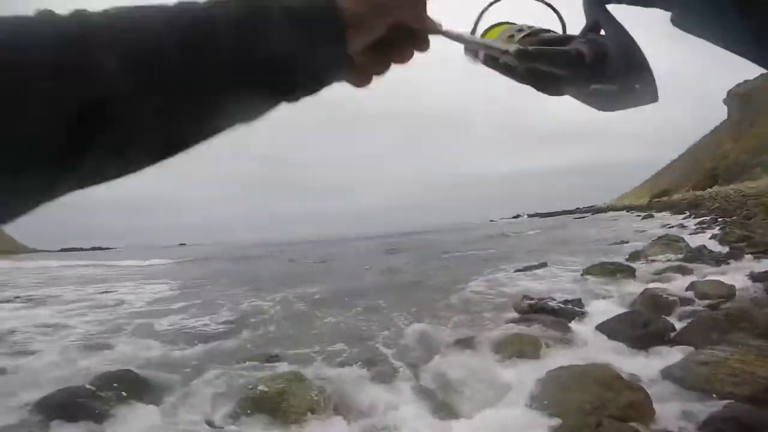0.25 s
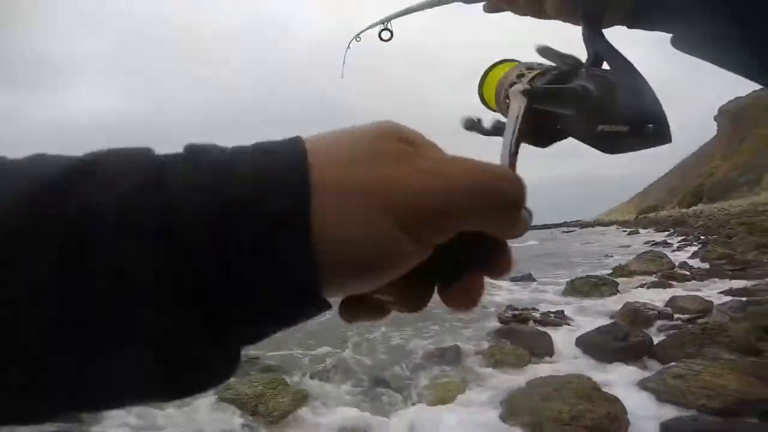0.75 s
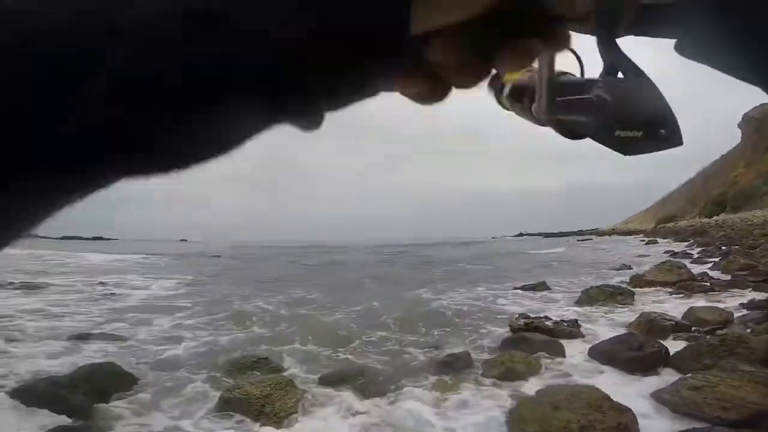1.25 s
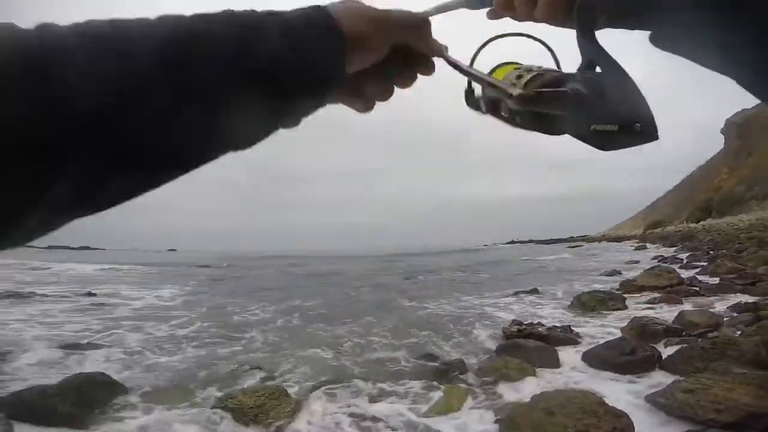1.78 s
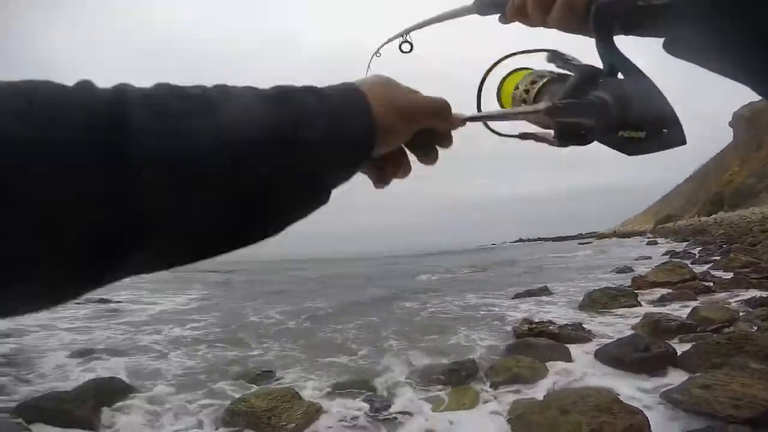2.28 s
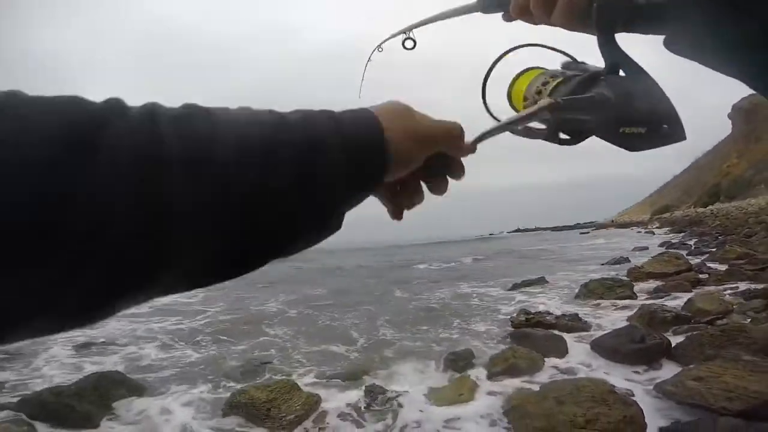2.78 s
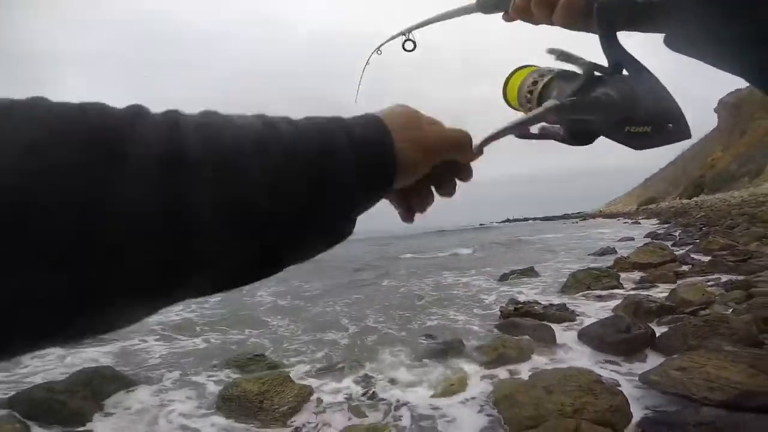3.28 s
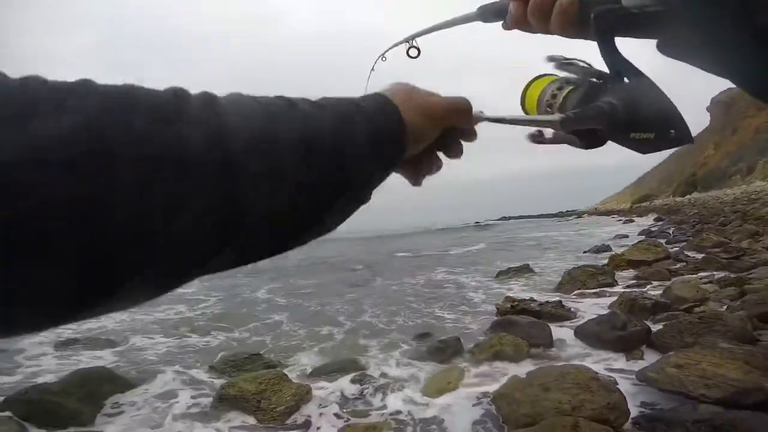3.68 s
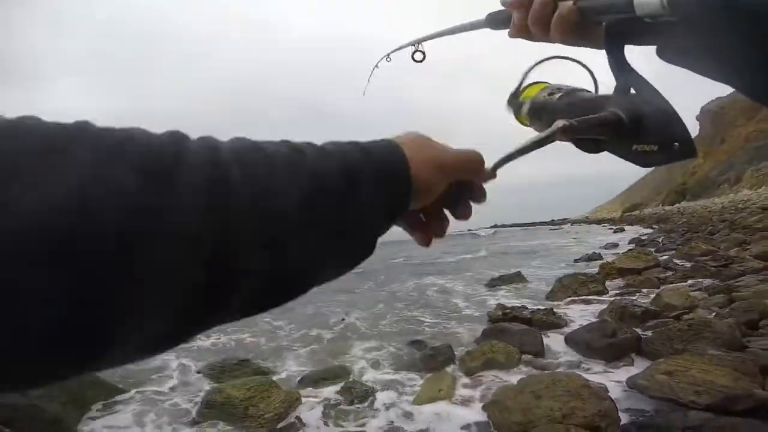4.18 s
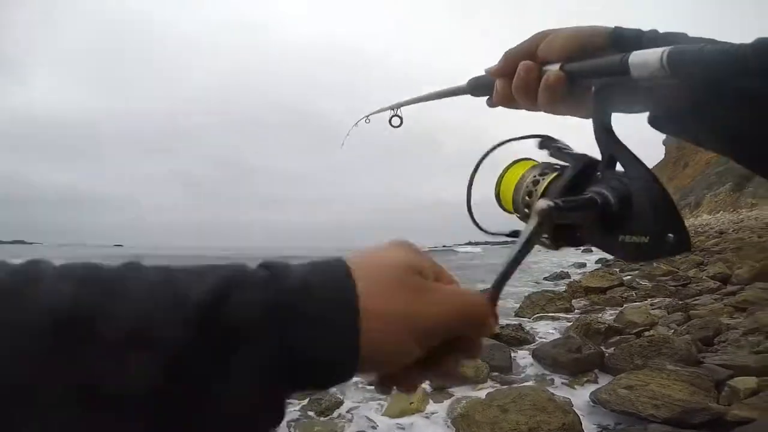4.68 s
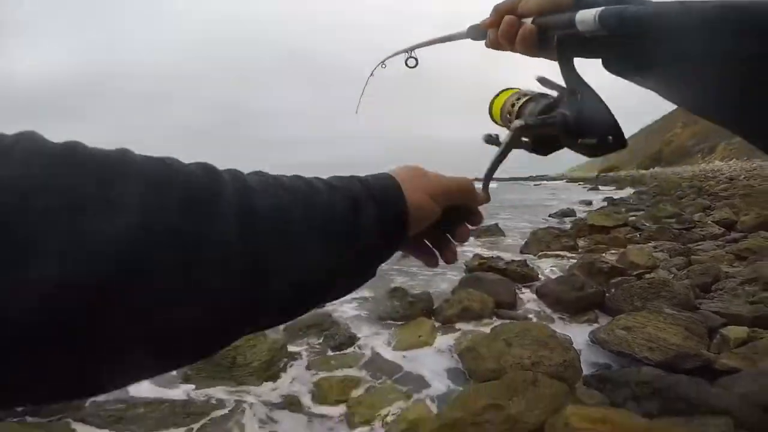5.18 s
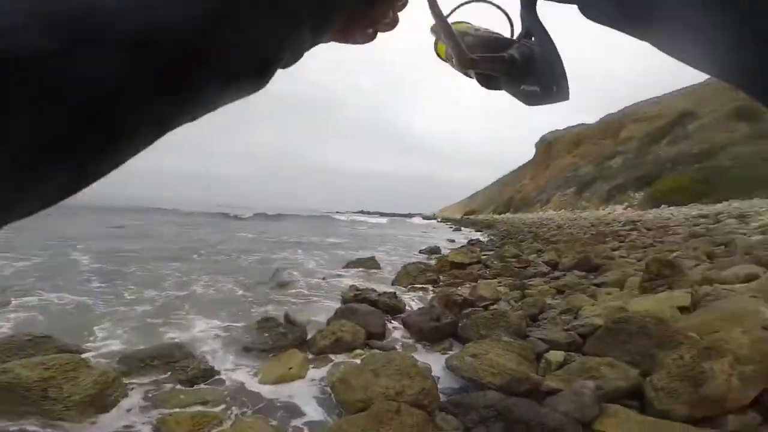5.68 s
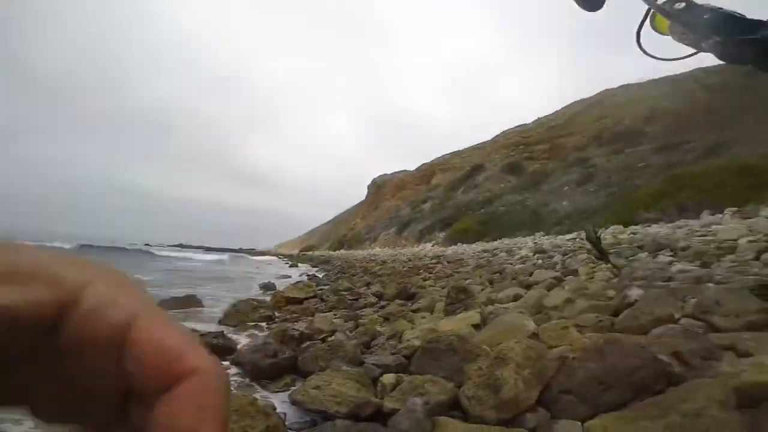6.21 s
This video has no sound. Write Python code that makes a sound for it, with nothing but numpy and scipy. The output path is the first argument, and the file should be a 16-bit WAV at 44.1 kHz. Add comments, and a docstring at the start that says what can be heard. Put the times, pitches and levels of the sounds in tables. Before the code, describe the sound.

A wave drains fizzing off nearby rocks, then muffled distant surf hisses under low wind buffeting, faint reel whirr and ticks, ending in heavy knocks.

```python
"""First a wave drains off wet rocks close by, with drops landing in its foam; then the far shore washes on.
All is heard at one microphone inside a closed camera housing. Water is filtered noise and bubble grains.
A cranked fishing reel whirrs and ticks (random gear touches, tiny rings) and jolts the mount (damped swings).
Wind buffets the microphone as low noise, and at the end a hand knocks and rubs the ringing shell."""
import sys
import numpy as np
from scipy import signal
from scipy.fft import rfft, irfft, next_fast_len
from scipy.io import wavfile
from scipy.ndimage import uniform_filter1d

SR = 44100
rng = np.random.default_rng(int(sys.argv[2]) if len(sys.argv) > 2 else 0)


def unload_wav(signal):
    """Save mono or channel-first audio to the path in sys.argv[1] as 16-bit WAV at rate SR, clipped to [-1, 1]."""
    wavfile.write(
        sys.argv[1],
        SR,
        np.round(np.clip(np.atleast_2d(signal).T, -1, 1) * 32767).astype(np.int16),
    )


def natural_amplitude(level_db):
    """Convert a level in decibels to a linear amplitude factor, elementwise."""
    exponent = np.asarray(level_db, float) / 20
    return 10 ** exponent


N = 284437
TIME = np.arange(N) / SR


def evened(x):
    """Scales to unit power."""
    return x / np.sqrt(np.mean(x ** 2) + 1e-20)


def read(points, hz):
    """Reads a spectrum in dB on a log-frequency axis."""
    f, value = np.transpose(points)
    return np.interp(np.log(hz + 1), np.log(f + 1), value)


def curve(rows, column=1):
    """One column of a table over all time, -200 dB outside it."""
    rows = np.array(rows)
    return np.interp(TIME, rows[:, 0], rows[:, column], -200, -200)


def add(mix, s, sound):
    """Mixes a sound in at second s."""
    part = mix[round(s * SR):][:len(sound)]
    part += sound[:len(part)]


def coloured(x, gain_db):
    """Filters x by a function from Hz to dB and evens the power."""
    size = next_fast_len(N)
    spectrum = rfft(x, size) * natural_amplitude(gain_db(np.fft.rfftfreq(size, 1 / SR)))
    return evened(irfft(spectrum, size)[:N])


def wander(hz):
    """Chance in a band: changes at about hz a second, with no long swells, at unit power."""
    def band_db(f):
        return -20 * np.log10(1 + (f / hz) ** 2 + (hz / 3 / (f + .01)) ** 2)
    return coloured(rng.standard_normal(N), band_db)


def ringing_db(modes, hz):
    """The summed response of (Hz, width, dB) resonances."""
    return 10 * np.log10(sum(natural_amplitude(db) ** 2 / (1 + (2 * (hz - f) / width) ** 2) for f, width, db in modes))


def ring(db, hz, cycles):
    """A tiny ring with a soft start: its envelope peaks after a third of the given cycles."""
    turns = np.arange(int(4 * cycles * SR / hz) + 4) * hz / SR
    u = 3 * turns / cycles
    return natural_amplitude(db) * np.sin(2 * np.pi * turns) * u * np.exp(1 - u)


def hiss(patchy_db):
    """Countless tiny bubbles: noise with drifting patches in time and frequency."""
    hz, t, z = signal.stft(rng.standard_normal(N), SR, nperseg=512, noverlap=384)
    patches = uniform_filter1d(rng.standard_normal(z.shape), 6, 0)  # smooth across pitch
    patches = evened(uniform_filter1d(patches, 20, 1))  # and along time
    return evened(signal.istft(z * natural_amplitude(patchy_db * patches), SR, nperseg=512, noverlap=384)[1][:N])


def bursts(per_s, spread_db, cycles):
    """Bursting bubbles: short rising grains of many pitches, a few of them large."""
    out = np.zeros(N)
    for hz in np.geomspace(400, 14000, num=24):
        u = np.linspace(0, 1, int(SR / hz * cycles) + 2)
        grain = np.sin(2 * np.pi * cycles * (u + 0.15 * u ** 2)) * u * np.exp(-4 * u)
        size = natural_amplitude(spread_db * np.minimum(rng.exponential(1, N), 4))
        size *= rng.random(N) < per_s / 24 / SR  # the pitches share the bursts evenly
        out += signal.oaconvolve(size, grain / np.linalg.norm(grain) * np.sqrt(hz))[:N]
    return out


# cavities around the microphone lift or cut narrow bands of the water: (pitch [Hz], width [Hz], lift [dB])
CAVITIES = [(1278, 100, 6), (2187, 420, 5), (2776, 145, 5), (3130, 61, 7), (3540, 220, 4), (5050, 420, 5.5),
            (6205, 180, 6), (7200, 1200, 3.5), (8770, 590, -3), (12050, 760, -6)]


def housing_db(hz):
    """The lift or cut that the housing cavities give."""
    return sum(db / (1 + (2 * (hz - f) / width) ** 2) for f, width, db in CAVITIES)


def swaying(x):
    """As the housing sways, the cavities that colour x drift in pitch and strength."""
    sway_hz, sway_depth = 50, .28  # rms drift in pitch and in share of the lift
    hz, t, z = signal.stft(x, SR, nperseg=1024, noverlap=768)
    drift, depth = (np.interp(t, TIME, wander(hz=1.67)) for _ in range(2))
    lift_db = housing_db(hz[:, None] + sway_hz * drift) * (1 + sway_depth * depth)
    return evened(signal.istft(z * natural_amplitude(lift_db), SR, nperseg=1024, noverlap=768)[1][:N])


# spectrum of the wave close by, outside the housing: (pitch [Hz], level [dB per Hz])
NEAR_SPECTRUM = [(120, -11), (300, -2.5), (700, -3.5), (1500, -7), (2500, -3.5), (3600, -9), (8000, -16.5),
                 (11000, -22), (15000, -26.5)]


def foam():
    """The near wave just after its splash: dense bubbles that fade as the water drains off the rocks."""
    water = hiss(patchy_db=1.2) + natural_amplitude(-7) * evened(bursts(per_s=1800, spread_db=3.8, cycles=3.))
    water = coloured(water, lambda f: read(NEAR_SPECTRUM, f) + housing_db(f))
    splash_db = 2 * np.exp(-TIME / 0.037)
    # it drains steadily, then dies faster once the rocks are bare
    drain_db_per_s, bare_s, dying_db_per_s = 11.5, 0.71, 17
    drained_db = drain_db_per_s * TIME + dying_db_per_s * np.maximum(TIME - bare_s, 0)
    # a last sheet of water slides in meanwhile
    surge_db = 0.5 * np.exp(-((TIME - 0.72) / 0.052) ** 2)
    return water * natural_amplitude(-33.5 + splash_db - drained_db + surge_db + 0.79 * wander(hz=22))


# drops landing in the near foam: (onset [s], peak [dB], pitch [Hz])
FOAM_DROPS = [(.18, -35, 2520), (0.2805, -23, 1950), (.378, -27, 2140), (.392, -36, 6200),
              (.464, -34, 4700), (.762, -29.5, 2020), (.793, -36, 2270)]


def drops():
    """Each drop rings for a few cycles and throws up three smaller ones soon after."""
    out = np.zeros(N)
    spatter_db, spatter_s = -9, 0.027  # smallest drop in level, longest delay
    landing = list(FOAM_DROPS)
    for s, db, hz in FOAM_DROPS * 3:
        late, weak, pitch = rng.random(3)
        landing.append((s + spatter_s * late, db + spatter_db * (1 + weak), hz * 2 ** (pitch - .5)))
    for s, db, hz in landing:
        add(out, s, ring(db, hz, cycles=3.2))
    return out


# pushes on the reel handle: (time of the hardest push [s], whirr level [dB])
HANDLE_PUSHES = [(2.28, -51), (2.62, -52), (2.9, -51), (4.05, -54.5), (4.43, -52), (4.62, -50.5),
                 (5.1, -52.5), (5.7, -56)]
# resonances of the reel body: (pitch [Hz], width [Hz], level [dB])
REEL_BODY = [(2700, 154, 3), (3770, 330, -7.5), (4980, 400, -10), (7660, 360, -13)]


def reel():
    """Gear teeth touch unevenly and ring the reel body; the whirr swells into each push and fades after it."""
    touches_per_s, push_db_per_s, coast_db_per_s = 2500, 38, 50
    teeth = (rng.random(N) < touches_per_s / SR) * rng.standard_normal(N).clip(-2, 2)
    teeth = teeth * natural_amplitude(1.4 * wander(hz=39))
    pushes_db = [db - np.maximum(push_db_per_s * (s - TIME), coast_db_per_s * (TIME - s))
                 for s, db in HANDLE_PUSHES]
    return coloured(teeth, lambda f: ringing_db(REEL_BODY, f)) * natural_amplitude(np.max(pushes_db, axis=0))


# the clearest ticks of the reel: (onset [s], peak [dB], pitch [Hz], length [cycles])
CLEAR_TICKS = [(1.495, -37, 5300, 3.6), (1.678, -42, 7540, 17), (1.836, -41, 4000, 3.4),
               (1.965, -48, 720, 7.8), (2.239, -36, 5330, 2.9), (2.613, -43, 4900, 9),
               (2.669, -41.5, 7500, 14), (2.904, -44, 6140, 13), (3.294, -40, 9000, 1.5),
               (3.828, -46, 11000, 3), (4.618, -42, 3550, 9), (4.623, -47, 7550, 12),
               (5.367, -36, 5000, 3.1)]


def ticks():
    """Reel ticks are tiny rings; fainter ones fall at random while the handle turns."""
    out = np.zeros(N)
    for s, db, hz, cycles in CLEAR_TICKS:
        add(out, s, ring(db, hz, cycles))
    for when, loud, pitch in rng.random(size=(32, 3)):
        s = np.interp(when, [0, 1], [1.2, 5.5])
        faint_db = -50.5 + 4 * (2 * loud - 1)
        add(out, s, ring(faint_db, hz=4500 * (13000 / 4500) ** pitch, cycles=4))
    return out


# jolts through the mount: (time of the largest swing [s], level before the travel limit [dB], pitch [Hz],
# damping [exponent on the envelope], direction [+-1], sag [below 1 each swing takes longer than the last])
MOUNT_JOLTS = [(0.399, -11, 89, 4.9, -1, 0.92), (.727, -30, 55, 3.4, -1, .8),
               (0.814, -19, 71.6, 3.5, 1, 0.52), (0.838, -23, 32, 2, 1, 0.4), (.958, -31, 85, 3.7, 1, .8),
               (1.05, -35, 346, 4, 1, 1), (1.178, -35.5, 95, 2, -1, 0.72),
               (1.971, -23.5, 65, 2.2, -1, 0.53), (2.401, -29.5, 93, 4, 1, 1),
               (2.845, -23, 70.5, 2.4, -1, 0.76), (3.331, -22, 94, 2, -1, 0.94),
               (3.509, -33, 90.5, 3.8, 1, 0.6), (3.774, -16, 94.6, 1.8, -1, 0.89),
               (5.0105, -31, 139, 1.4, -1, 0.25), (5.351, -15.5, 95.5, 1.6, 1, 0.96),
               (6.377, 1, 57.3, 3, -1, 0.75), (6.427, -20, 227, 0.48, 1, 1),
               (6.452, -5.5, 48.3, 1.7, -1, 0.93)]


def mount():
    """Each jolt builds, peaks, and the mount rocks to rest in a quick and a slow mode."""
    out = np.zeros(N)
    lead = 0.91  # cycles from the first motion to the largest swing
    for s, db, hz, damping, direction, sag in MOUNT_JOLTS:
        # quick jolts rock the mount more: the share of the slow mode climbs with pitch
        slow = np.interp(hz, [68, 85.6], [0.17, 0.41])
        u = np.arange(int(8 * SR / hz)) * hz / SR / lead
        build = u * np.exp(1 - u)
        turns = 2 * np.pi * lead * (u ** sag - 1) / sag
        quick_swing = build ** damping * np.cos(turns)
        slow_swing = build * np.cos(0.527 * turns)
        swing = (1 - slow) * quick_swing + slow * slow_swing
        add(out, s - lead / hz, np.sign(direction) * natural_amplitude(db) * swing)
    travel = .86  # of full scale; the microphone membrane stiffens near this end of its travel
    return out / (1 + abs(out / travel) ** 6) ** (1 / 6)


# modes of the plastic shell: (pitch [Hz], level [dB], t60 [s])
SHELL_MODES = [(614, 4.5, 0.024), (1190, -0.5, 0.014), (1850, 0.5, 0.0079), (2065, 0, 0.0099),
               (3100, -8, 0.0057), (4140, -12.5, 0.013), (5400, -20, 0.014)]
# knocks on the shell: (onset [s], level [dB], factor on the shell pitch, favoured pitch [Hz],
# loss one octave away from it [dB])
SHELL_KNOCKS = [(6.364, -15.5, 0.993, 1210, 2), (6.3712, -22, 1.0, 4600, 6), (6.3742, -20, 1.0, 1230, 1),
                (6.4362, -8, 1.186, 1450, 19)]


def knocks():
    """A finger knocks the plastic shell, and its modes ring and die away."""
    out = np.zeros(N)
    t = np.arange(4000) / SR
    soft = (1 - np.exp(-t / 0.00052)) ** 2  # a finger pad, not a hard edge
    for s, db, factor, best_hz, lost_db in SHELL_KNOCKS:
        for hz, mode_db, t60 in SHELL_MODES:
            start_db = db + mode_db - lost_db * abs(np.log2(hz * factor / best_hz))
            add(out, s, soft * natural_amplitude(start_db - 60 * t / t60) * np.sin(2 * np.pi * hz * factor * t))
    return out


# skin dragging over the shell between the knocks: (time [s], level [dB], brightness [dB per octave])
SKIN_DRAG = [(6.364, -59, 4), (6.371, -36, 0), (6.388, -33, 0.5), (6.4, -35.5, -1.5), (6.413, -42, 0),
             (6.428, -35, 0.5), (6.45, -33.5, 0)]


def rub():
    """Skin sticks and slips over the shell: uneven noise through the damped shell modes."""
    grip = rng.standard_normal(N) * natural_amplitude(2.2 * wander(hz=200))
    damped = [(hz, 120, db) for hz, db, t60 in SHELL_MODES]  # the hand widens each mode to 120 Hz

    def skin_db(f):
        return ringing_db(damped, f) + 5 * np.log2(1 + f / 1000) - 12 * np.log2(1 + (f / 7000) ** 2)
    skin = coloured(grip, skin_db)
    hz, t, z = signal.stft(skin, SR, nperseg=128)
    brightness = np.interp(t, TIME, curve(SKIN_DRAG, column=2).clip(-9, 12))
    tilt_db = brightness * np.log2((hz[:, None] + 300) / 2000)
    return signal.istft(z * natural_amplitude(tilt_db), SR, nperseg=128)[1][:N] * natural_amplitude(curve(SKIN_DRAG))


# wind at the microphone: (time [s], slow buffeting level [dB], flutter level [dB])
GUSTS = [(0, -38, -40.5), (.2, -42.5, -59), (.32, -26.5, -42), (.47, -35.5, -51), (.93, -29.5, -49),
         (1.13, -35, -55), (1.35, -31, -54), (1.58, -37, -51.5), (1.83, -31.5, -62), (2.05, -42.5, -50.5),
         (2.3, -33, -57), (2.49, -44, -57), (2.65, -35.5, -55), (3.1, -40, -54.5), (3.4, -36, -53.5),
         (4.5, -39.5, -51.5), (5.1, -45, -48.5), (5.33, -34, -49), (5.7, -45, -56), (6.25, -42, -46.5),
         (6.45, -34, -37)]
# spectrum of the slow buffeting: (pitch [Hz], level [dB per Hz])
BUFFET_SPECTRUM = [(4, -3), (9, 3), (15, 16), (22, 6.5), (32, 1), (50, -8), (80, -65)]
# spectrum of the flutter above it: (pitch [Hz], level [dB per Hz])
FLUTTER_SPECTRUM = [(20, -35), (40, -1), (70, -2), (110, -7), (160, -24), (250, -27), (500, -78)]


def wind():
    """Eddies press on the port: a slow, fairly even heave and a lumpy flutter, stirred up by each jolt."""
    heave = coloured(rng.standard_normal(N), lambda f: read(BUFFET_SPECTRUM, f))
    # eddies shed one after another, which evens the heave
    heave = evened(heave / (uniform_filter1d(heave ** 2, SR // 10) + .05) ** 0.3)
    flutter = coloured(rng.standard_normal(N), lambda f: read(FLUTTER_SPECTRUM, f))
    # after a jolt the housing keeps shaking, this far below it
    shake_db, shake_t60_s = -21, 0.24
    shake = sum((TIME > s) * natural_amplitude(db + shake_db - 60 * abs(TIME - s) / shake_t60_s)
                for s, db, *rest in MOUNT_JOLTS)
    stir = np.hypot(natural_amplitude(curve(GUSTS, column=2)), shake)
    heave = heave * natural_amplitude(curve(GUSTS) + 0.7 * wander(hz=28.0))
    return heave + flutter * stir * natural_amplitude(2.3 * wander(hz=14.5))


# the far wash: (time [s], level before the brightness [dB], brightness as gain above 3500 Hz [dB])
FAR_WASH = [(0, -41.5, -14), (1.3, -49, -0.5), (2.1, -50.5, -0.5), (2.87, -49.5, 0.5), (3.82, -50, -2),
            (4.6, -48, -4), (5.3, -47, -5.5), (5.85, -47, -4), (6.05, -44.5, -7), (6.24, -46, -8),
            (6.45, -45, -6)]
# spectrum of the far wash, outside the housing: (pitch [Hz], level [dB per Hz])
FAR_SPECTRUM = [(71, -39), (120, -1), (203, -4.5), (504, -3), (803, -5.5), (1040, -5.5), (1280, -1.5),
                (1730, -6), (2750, -6), (4300, -13.5), (5700, -15.5), (15000, -26.5)]


def surf():
    """The far wash: smooth hiss with some bubbles, duller when the housing turns away."""
    water = hiss(patchy_db=0.94) + natural_amplitude(-9.5) * evened(bursts(per_s=1500, spread_db=4.0, cycles=4.6))
    water = swaying(coloured(water, lambda f: read(FAR_SPECTRUM, f)))
    treble = signal.sosfilt(signal.butter(1, 3500, "high", fs=SR, output="sos"), water)
    water += (natural_amplitude(curve(FAR_WASH, column=2)) - 1) * treble
    splashes_db = .55 * wander(hz=14)  # small splashes land all the time
    return water * natural_amplitude(curve(FAR_WASH) + splashes_db)


def scene():
    """All sources at one microphone."""
    near_water = foam() + drops()
    fishing = reel() + ticks() + mount()
    hand = knocks() + rub()
    return (near_water + fishing + hand + wind() + surf())[None]


def roll_off(x):
    """The treble ends steeply here."""
    return signal.sosfilt(signal.butter(12, 15200, fs=SR, output="sos"), x)


def record(dry):
    """The microphone adds its own steady hiss, softer towards the treble."""
    own_hiss = natural_amplitude(-72.5) * coloured(rng.standard_normal(N), lambda f: -3 * np.log2(1 + f / 4000))
    return roll_off(dry + own_hiss)


dry = scene()
out = record(dry)
unload_wav(out)
```